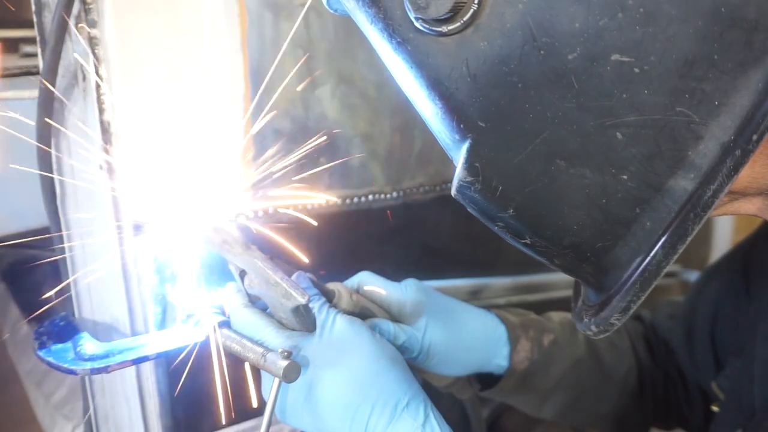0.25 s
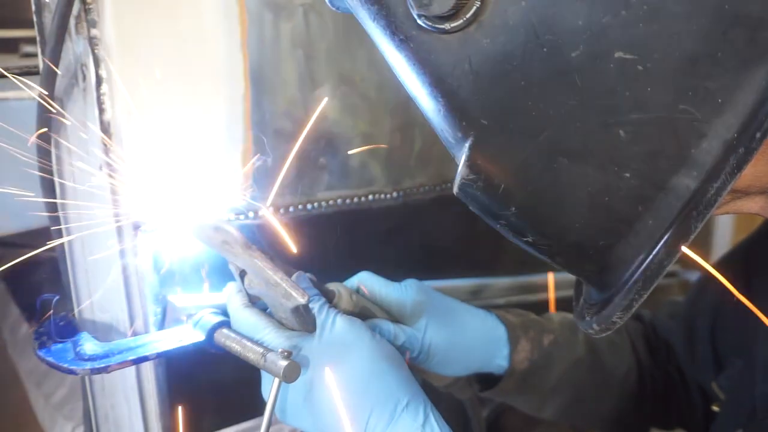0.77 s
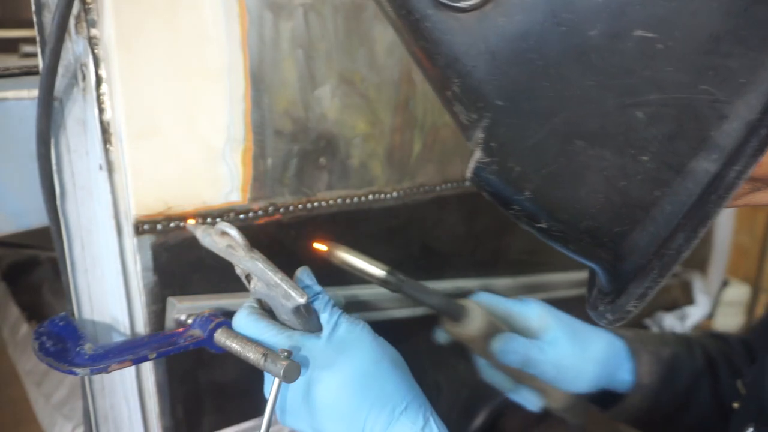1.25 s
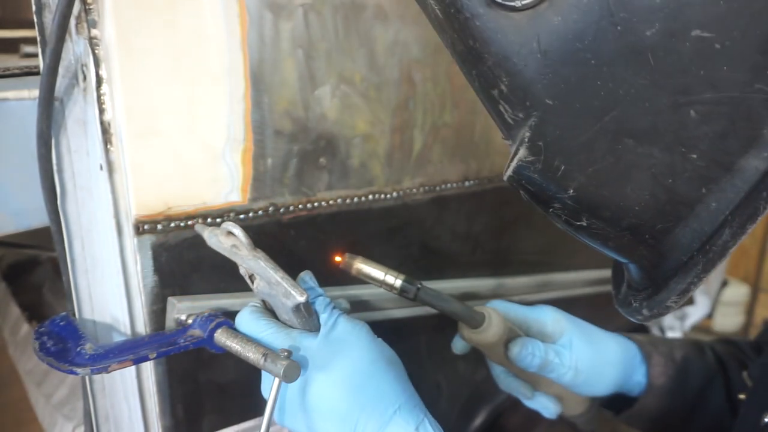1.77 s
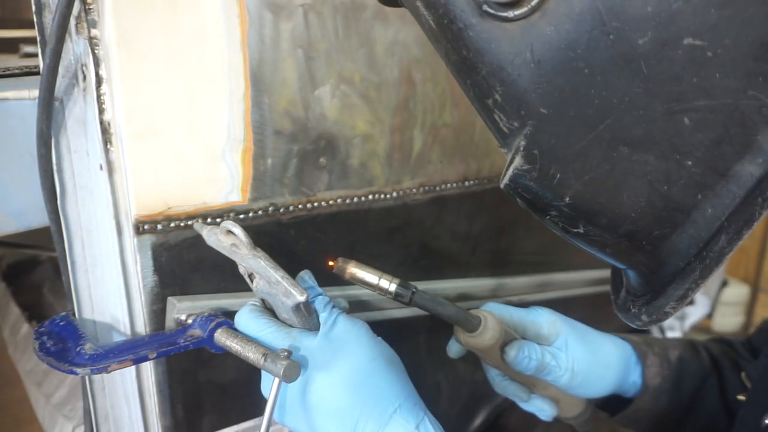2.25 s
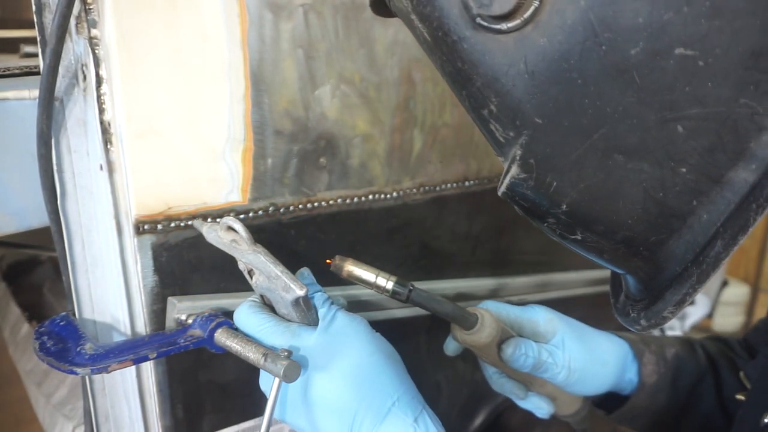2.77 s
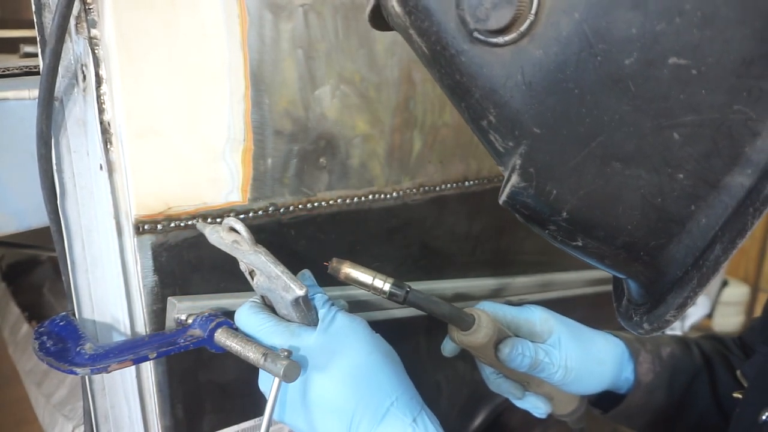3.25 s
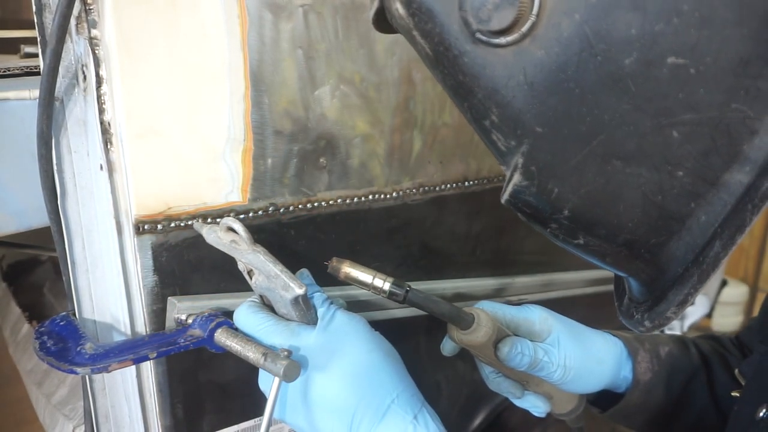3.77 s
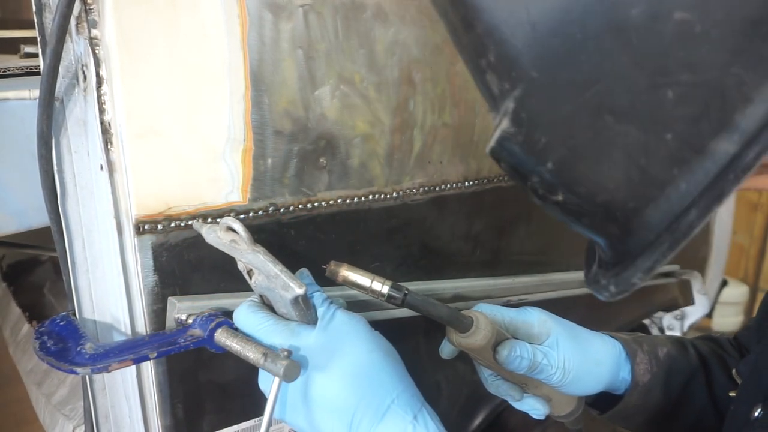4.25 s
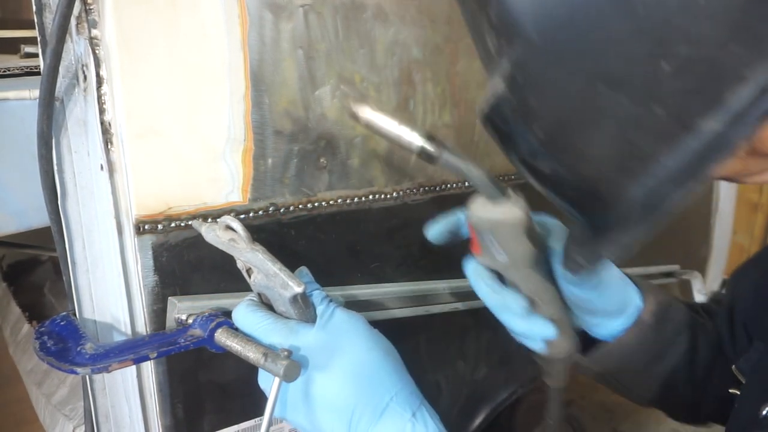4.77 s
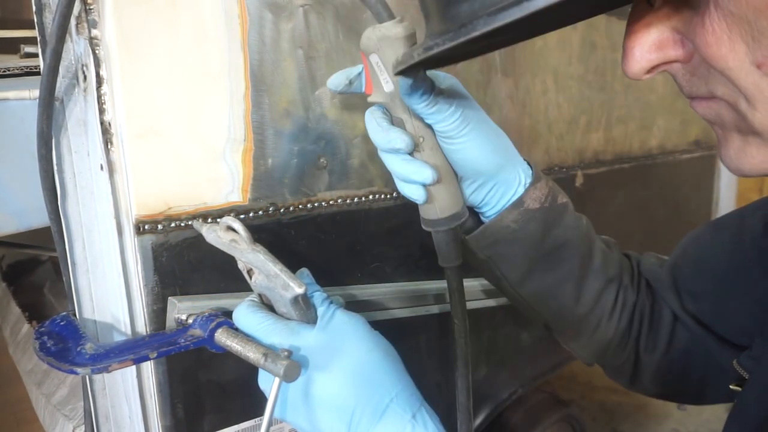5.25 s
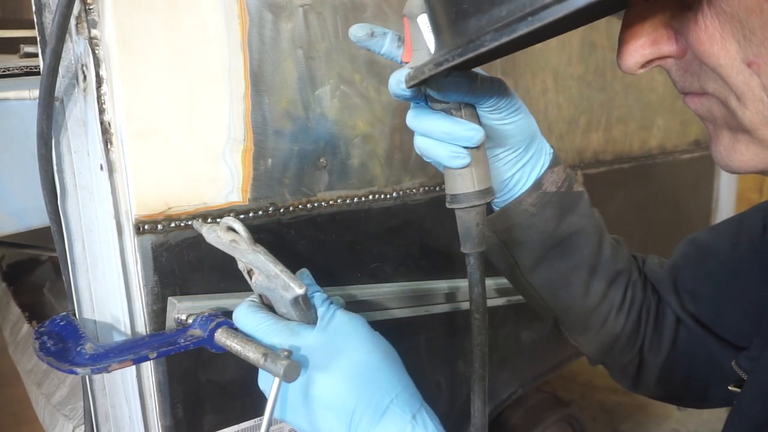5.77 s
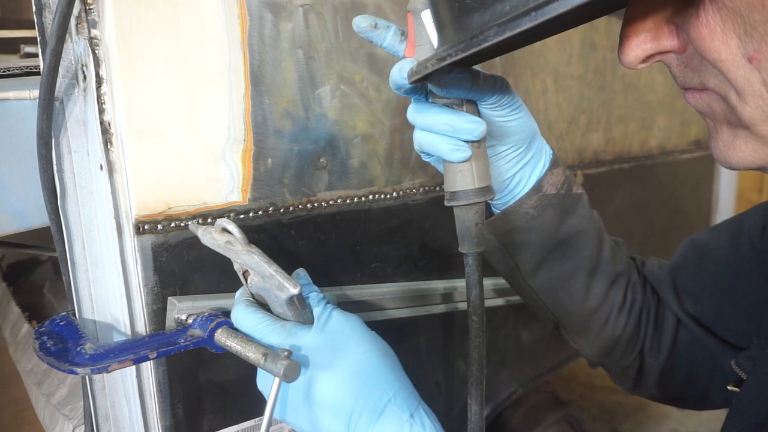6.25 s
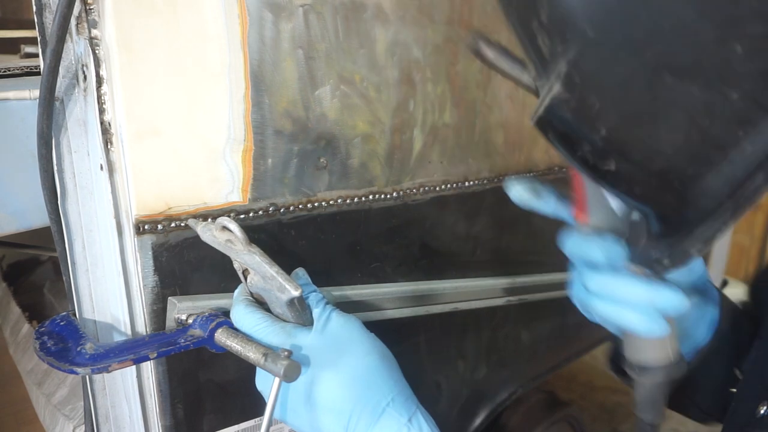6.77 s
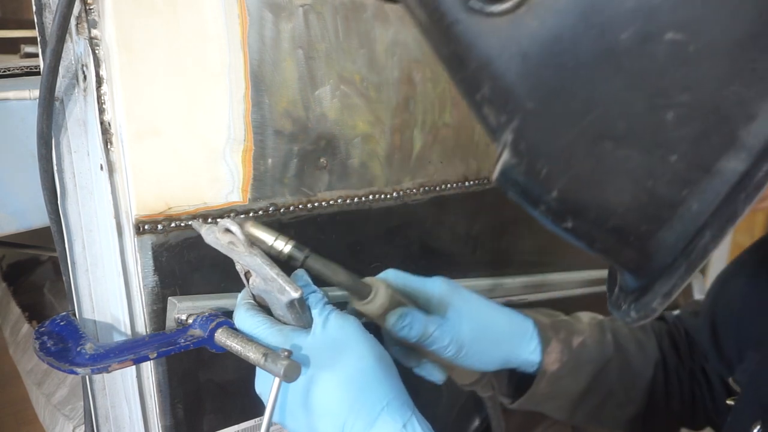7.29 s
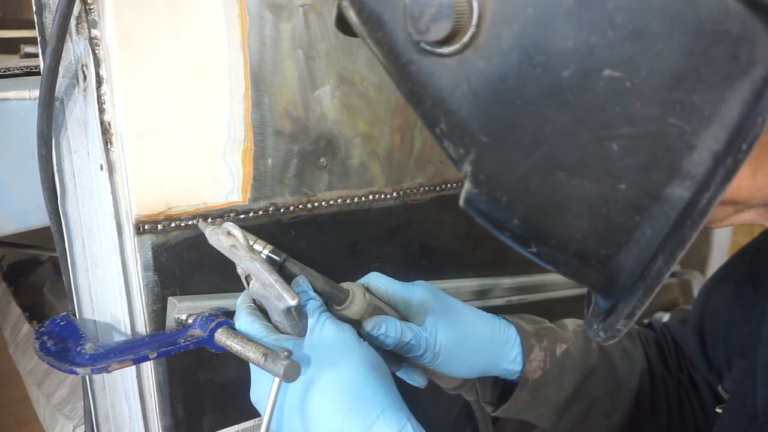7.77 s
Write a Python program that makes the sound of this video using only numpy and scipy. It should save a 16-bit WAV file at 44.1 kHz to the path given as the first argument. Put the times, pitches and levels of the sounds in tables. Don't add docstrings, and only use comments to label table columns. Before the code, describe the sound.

Harsh, dry welding crackle opens the scene, heard very near in stereo with a short workshop reverberation. After a small gap, a sharp high-pitched air hiss starts and holds, fluttering slightly, faintly singing at moments. It ends abruptly around six seconds. The automatic level slowly lifts the quiet fan tone and rushing air, while soft thumps, a light click on metal and a small wiry squeal are heard.

```python
import sys
import numpy as np
from scipy import signal
from scipy.fft import rfft, irfft, next_fast_len
from scipy.io import wavfile

SR = 44100
rng = np.random.default_rng(int(sys.argv[2]) if len(sys.argv) > 2 else 0)


def to_wav(sig):
    pcm = np.clip(np.atleast_2d(sig), -1, 1) * 32767
    pcm = np.round(pcm).astype(np.int16)
    wavfile.write(sys.argv[1], SR, pcm.T)


def field_ratio(decibels):
    return 10 ** (np.asarray(decibels, dtype=float) / 20)


N = 353682
TIME = np.arange(N) / SR
SIZE = next_fast_len(N + SR)
HZ = np.maximum(np.arange(SIZE // 2 + 1) * SR / SIZE, 1)

# start_s, crack_peak_db, pop_above_crack_db (bigger drop, louder pop)
SPUTTER = [(.03415, -9, -8), (.04565, -14, -31), (.06317, -11, -37), (.07059, -13, -38), (.07531, -14, -39),
           (.08567, -13, -50), (.09594, -14, -46), (.10392, -12, -39), (.11687, -12, -31),
           (.12556, -12, -43), (.15789, -11, -37), (.17519, -14, -29), (.18907, -14, -45),
           (.20515, -12, -27), (.20973, -12, -43), (.22739, -12, -20), (.24005, -12, -42),
           (.24515, -9, -13), (.24998, -16, -32), (.26837, -13, -38), (.28626, -11, -45),
           (.30447, -12, -39), (.31002, -15, -22), (.33032, -11, -33), (.33617, -12, -35),
           (.34653, -13, -37), (.37283, -14, -33), (.3893, -12, -42), (.39435, -12, -39), (.4007, -14, -42)]
# start_s, crack_peak_db, pop_above_crack_db
STEADY = [(.45447, -8, -26), (.46007, -13, -36), (.48914, -12, -28), (.50127, -11, -25), (.52288, -11, -23),
          (.53535, -13, -32), (.54825, -12, -31), (.55444, -13, -33), (.56102, -12, -35),
          (.58363, -11, -41), (.59757, -11, -39), (.62068, -12, -38), (.63463, -9, -35), (.64812, -13, -30),
          (.661, -12, -30), (.67517, -12, -28), (.69095, -12, -36), (.70526, -10, -35), (.71714, -12, -30),
          (.72454, -13, -43), (.73184, -12, -37), (.74757, -11, -34), (.75481, -15, -31),
          (.76281, -10, -30), (.77984, -12, -24), (.78717, -11, -33), (.79941, -14, -32), (.81426, -9, -35),
          (.8273, -9, -28), (.87122, -13, -36)]
# time_s, level_db
SIZZLE = [(0, -40), (.05, -38.5), (.14, -51), (.25, -47), (.41, -46), (.435, -33.5), (.47, -41), (.6, -47),
          (.82, -49)]
# pitch_hz, width_hz, left_gain, right_gain
CRACK_RESONANCES = [(1250, 900, -.3, -.45), (1850, 600, -1.1, -.5), (2700, 1900, -.85, -.8),
                    (4100, 1100, -.9, -.6), (6240, 600, 1.9, .3), (7900, 1650, 5.6, -.25),
                    (9600, 2100, -2.5, 2.5)]
# delay_ms, left_gain, right_gain
CRACK_ECHOES = [(.5, -.35, -.35), (.75, -.05, -.26), (1.13, 0, -.3), (1.51, -.04, .17), (1.84, .22, .16),
                (2.28, -.1, .05), (6.9, .1, .06)]

# pitch_hz, level_db, settling_change_db
WHINE = [(220, -92, -4), (405, -79, -7), (586.6, -48, 0.0), (673, -69, 0.0), (764, -83.5, -4),
         (1002, -83, 0), (1166, -89, 13), (1216, -90.5, 6)]
# pitch_hz, density_db
FAN_AIR = [(24, -81), (40, -54), (112, -67.5), (212, -40), (309, -46), (391, -34), (450, -42.5), (518, -25),
           (583, -14.5), (737, -32.5), (890, -32.5), (1460, -27), (3090, -34.5), (5560, -34.5),
           (11000, -48.5), (14300, -93), (22000, -120)]
# pitch_hz, left_minus_right_db
FAN_BALANCE = [(60, 5.5), (110, -7.5), (190, 3), (350, -2.5), (630, -4.5), (1130, -11.5), (2020, -5),
               (3640, -5.5), (6540, -2), (11800, -3)]
# time_s, level_db
AIR_SWELL = [(0, 6), (6.3, 2.5), (6.65, -3), (6.75, 0), (8.02, 3)]
# middle_s, length_s, lift_db
TONE_SWELL = (3.42, .35, 4.5)

# start_s, peak_db, pitch_hz, width_hz
BUMPS = [(.83, -48, 300, 110), (.88, -56, 300, 110), (6.1, -69, 300, 350), (6.72, -62, 1230, 1200),
         (6.724, -58, 303, 486), (6.755, -72, 140, 201), (6.781, -67, 200, 270), (6.775, -49, 490, 200),
         (6.83, -63, 330, 300), (7.52, -75, 250, 300), (7.69, -69, 220, 300)]
# start_s, peak_db, pitch_hz, width_hz, t60_s
LEAKS = [
    (1.06, -42, 9400, 2160, .81),
    (7.52, -57, 9700, 2520, 0.34),
    (7.83, -43.5, 10880, 350, 0.34),
]
# start_s, peak_db, pitch_hz, width_hz, t60_s
TICKS = [
    (6.84, -62, 1980, 400, 0.27),
    (6.845, -67, 2680, 900, .25),
    (6.85, -72, 6800, 5000, .21),
    (7.696, -52.5, 5500, 9050, .053),
    (7.699, -60, 6481, 6480, .42),
]

# time_s, level_db, turned_away (0-1)
JET = [(1.257, -31.5, 0.01), (1.272, -36.5, 0), (1.33, -33, 0), (1.42, -32, 0.2), (1.7, -33, 0.2),
       (2.2, -32.5, .4), (2.6, -32.5, 0.6), (3, -32, .6), (3.6, -32, 0.5), (4.2, -33, 0.5),
       (4.7, -31.5, 0.8), (5.04, -31, .7), (5.2, -32, 0.6), (5.8, -32, .7), (6.08, -32, .7)]
# pitch_hz, level_db
JET_COLOUR = [(30, -72), (80, -56), (300, -40), (700, -22.5), (1200, -18.5), (2000, -17), (2900, -14),
              (5000, -8.5), (7000, -5), (8500, -2.5), (9500, -1), (10300, 3), (10900, 4), (13000, 2)]
# pitch_hz, left_minus_right_db
JET_BALANCE = [(100, -9), (350, 4), (1100, 4), (2000, 1), (3600, 6), (6500, 6), (9000, 6), (10200, 2.5),
               (10900, 7.5)]
# pitch_hz, left_lead_rad
JET_LEAD = [(100, -.5), (1200, 0.0), (2200, .4), (3200, 1.7), (6500, 2.0), (9400, 2.0), (10700, 2.6),
            (12000, 2.8)]
# middle_s, length_s, pitch_hz, width_hz, level_db
EDGE_TONES = [(1.42, .06, 4000, 300, -46), (1.57, .04, 4400, 300, -48), (2.45, .08, 4100, 250, -55),
              (5.02, .04, 10300, 900, -38), (4.55, .3, 2800, 160, -55), (5.15, .35, 2950, 260, -53),
              (5.85, .3, 2950, 260, -51)]

# pitch_hz, send_db
ROOM_SEND = [(200, -10), (600, 1), (3000, 2.5), (8000, -2.5), (11000, 0)]
# pitch_hz, t60_s
ROOM_T60 = [(200, 0.34), (450, 0.43), (1000, 0.52), (3000, 0.48), (6000, 0.5), (11000, 0.37)]
# start_s, end_s, depth_db, creep_db_per_s, release_s
DUCKS = [
    (-.1, 0, 22, 0, .018),
    (.034, .87, 28, 8, .055),
    (1.245, 6, 24.5, 1.5, 0.25),
]


def rms_one(x):
    return x / np.sqrt(np.mean(x ** 2) + 1e-20)


def in_time(rows):
    s, *columns = np.transpose(rows)
    return [np.interp(TIME, s, column) for column in columns]


def at_hz(points, hz):
    point_hz, value = np.array(points).T
    return np.interp(np.log(hz), np.log(point_hz), value)


def shaped(x, response):
    return irfft(rfft(x, SIZE) * response, SIZE)[..., :N]


def late(ms):
    return np.exp(-2j * np.pi * HZ * ms / 1000)


def resonate(x, hz, width_hz):
    r = np.exp(-np.pi * width_hz / SR)
    poles = [1, -2 * r * np.cos(2 * np.pi * hz / SR), r * r]
    return signal.lfilter([(1 - r * r) / 2, 0, (r * r - 1) / 2], poles, x)


def band_pass(x, low, high):
    return signal.sosfilt(signal.butter(2, [low, high], "band", fs=SR, output="sos"), x)


def drift(rate):
    r = np.exp(-80 * np.pi * rate / SR)
    slow = signal.lfilter([1], [1, -2 * r, r * r], rng.standard_normal(N // 40 + 2002))[2000:]
    return np.interp(np.arange(N) / 40, np.arange(len(slow)), rms_one(slow))


def ports(x, balance, lead):
    half = field_ratio(at_hz(balance, HZ) / 2) * np.exp(.5j * lead)
    return shaped(x, np.array([half, 1 / half]))


def burst(start, rise, t60, hz, width_hz):
    t = np.arange(SR // 2) / SR
    noise = resonate(resonate(rng.standard_normal(len(t)), hz, width_hz), hz, width_hz)
    swell = 1 - np.exp(-(t / rise) ** 2)
    fade_out = np.minimum((.5 - t) / .1, 1)
    out, at = np.zeros(N + len(t)), round(start * SR)
    out[at:at + len(t)] = rms_one(noise) * swell * field_ratio(-60 * t / t60) * fade_out
    return out[:N]


def gain_ride():
    rest_db, duck_s, slow_release_s = 4, .03, 1.4
    gain_db = rest_db
    for start, end, depth_db, creep, release in DUCKS:
        held_db = depth_db - creep * (np.clip(TIME, start, end) - start)
        since = np.maximum(TIME - end, 0)
        slow = np.clip(0.57 * (1 - np.exp(-(end - start) / 0.99)), 0, 1)
        left = (1 - slow) * np.exp(-since / release) + slow * np.exp(-since / slow_release_s)
        gain_db = gain_db - held_db * np.clip((TIME - start) / duck_s, 0, 1) * left
    return gain_db


def shorts():
    touch_share, touch_db, touch_pop_db = .75, -24, -32
    touch_lead_s = (.003, .009)
    restrike_s, stub_step_s, stub_db, stub_pop_db = .4545, .004, -23.5, -36
    s, crack_db, pop_db = np.transpose(SPUTTER + STEADY)
    luck = rng.random((len(s), 3))
    grazed = luck[:, 0] < touch_share
    touches = (s - np.interp(luck[:, 1], [0, 1], touch_lead_s))[grazed]
    touch_crack_db = touch_db + 6 * (luck[grazed, 0] - .4)
    touch_pops_db = touch_pop_db + 10 * (luck[grazed, 2] - .5)
    stubs = restrike_s - stub_step_s * np.arange(1, 7)
    crack_db = np.r_[crack_db, touch_crack_db, np.full(len(stubs), stub_db)]
    pop_db = np.r_[pop_db, touch_pops_db, np.full(len(stubs), stub_pop_db)]
    body_db = -16.5 + 0.41 * (pop_db + 33)
    return np.r_[s, touches, stubs], crack_db, body_db, pop_db


def arc(gain_db):
    s, crack_db, body_db, pop_db = shorts()
    at = np.round(s * SR).astype(int)
    crack_db = crack_db - gain_db[at]
    pops = np.zeros(N)
    pops[at] = field_ratio(crack_db + 1.06 * pop_db + 27.5)

    spit_size = field_ratio(4.0 * np.minimum(rng.exponential(1, N), 5))
    spits = (rng.random(N) < 9000 / SR) * spit_size * rng.choice([-1, 1], N)
    sizzle = rms_one(spits) * field_ratio(in_time(SIZZLE)[0] - gain_db - 5) * (TIME < .88)

    shades_db = 1.2 * rng.normal(0, 1, (len(at), len(CRACK_RESONANCES)))
    crack = 0
    for k, (hz, width_hz, left, right) in enumerate(CRACK_RESONANCES):
        clicks = sizzle.copy()
        big_db = (np.minimum(body_db, -13.5) + 17.5) * np.clip((3800 - hz) / 2600, 0, 1)
        clicks[at] += field_ratio(crack_db + big_db + 1.3 + shades_db[:, k])
        crack = crack + resonate(clicks, hz, width_hz) * [[left], [right]]
    bounce = 1 + sum(np.array([[left], [right]]) * late(ms) for ms, left, right in CRACK_ECHOES)
    crack = shaped(crack, bounce * np.array([late(-.072), late(-.01)]))

    pop = shaped(resonate(pops, 515, 320), late(.2))
    thud = field_ratio(-6) * resonate(pops, 200, 330)
    return crack + thud + ports(pop, [(100, -6.0), (1000, -9.0)], -2.37)


def fan():
    waver = np.cumsum(1 + 0.000652 * drift(0.46) + .0012 * drift(14.5)) / SR
    settled = np.clip((TIME - 6.5) / 1.07, 0, 1)
    tones = 0
    for hz, level_db, change_db in WHINE:
        tone_db = level_db + change_db * settled + 3 + 0.59 * drift(5.9)
        tones = tones + field_ratio(tone_db) * np.sin(2 * np.pi * hz * waver)
    s, length, swell_db = TONE_SWELL
    tones = tones * field_ratio(swell_db * np.exp(-((TIME - s) / length) ** 2))
    skirt = field_ratio(-70) * rms_one(resonate(resonate(rng.standard_normal(N), 592, 120), 592, 120))

    shared, left, right = shaped(rng.standard_normal((3, N)), field_ratio(at_hz(FAN_AIR, HZ)))
    apart = 1 / (1 + (1400 / HZ) ** 2)
    air = shaped(shared, np.sqrt(1 - apart)) + shaped(np.array([left, right]), np.sqrt(apart))
    air = shaped(air, field_ratio(at_hz(FAN_BALANCE, HZ) * [[.5], [-.5]]))
    air = field_ratio(-64.5) * rms_one(air) * field_ratio(in_time(AIR_SWELL)[0] + .8 * drift(2.7))
    return ports(tones + skirt, FAN_BALANCE, -0.25) + air


def body_bumps():
    return sum(field_ratio(peak_db) * burst(s, 0.011, 0.18, hz, width_hz) for s, peak_db, hz, width_hz in BUMPS)


def trigger_leaks():
    return sum(field_ratio(peak_db) * burst(s, .11 * t60, t60, hz, width_hz)
               for s, peak_db, hz, width_hz, t60 in LEAKS)


def air_gun(gain_db):
    on_s, open_s, off_s, shut_s = 1.243, 0.016, 6.104, 0.023
    treble_db, away = in_time(JET)
    wobble_db = .6 * drift(7.1)
    middle_db = 0.5 * away + wobble_db
    bass_db = -14 * away + 2.25 * wobble_db
    white, together, bands = rng.standard_normal((2, N)), drift(22), 0
    edges = 35 * 2 ** np.arange(0, 9.1, .5)
    for k, (low, high) in enumerate(zip(edges, edges[1:])):
        band = band_pass(white[k % 2], low, high)
        middle = np.interp(np.log2(low), np.log2([400, 1200, 4000, 7000]), [0, 1, 1, 0])
        bass = np.interp(np.log2(low), np.log2([400, 1200]), [1, 0])
        aim_db = middle * (middle_db - middle_db.mean()) + bass * (bass_db - bass_db.mean())
        flutter_db = .5 * together + 0.56 * drift(2.4) + 1.13 * drift(58)
        bands = bands + band * field_ratio(flutter_db + aim_db)
    jet = rms_one(shaped(bands, field_ratio(at_hz(JET_COLOUR, HZ)))) * field_ratio(treble_db + 5.0)
    for s, length, hz, width_hz, level_db in EDGE_TONES:
        tone = rms_one(resonate(resonate(white[0], hz, width_hz), hz, width_hz))
        jet = jet + field_ratio(level_db) * tone * np.exp(-((TIME - s) / length) ** 2)
    trigger = np.clip((TIME - on_s) / open_s, 0, 1) * np.clip((off_s - TIME) / shut_s, 0, 1)
    return jet * trigger * field_ratio(-gain_db)


def torch_ticks():
    return sum(field_ratio(peak_db) * burst(s, 0.0032, t60, hz, width_hz)
               for s, peak_db, hz, width_hz, t60 in TICKS)


def workshop(x):
    white, tail = rng.standard_normal((2, 3, N)), 0
    edges = 177 * 2 ** (np.arange(20) / 3)
    build = np.exp(-1 / (0.0046 * SR))
    for k, (low, high) in enumerate(zip(edges, edges[1:])):
        keep = field_ratio(-120 / (at_hz(ROOM_T60, np.sqrt(low * high)) * SR))
        energy = signal.lfilter([1 - keep], [1, -keep], band_pass(x, low, high) ** 2)
        energy = signal.lfilter([1 - build], [1, -build], energy)
        shared, *own = rms_one(band_pass(white[k % 2], low, high))
        apart = 1 / (1 + (700 / low) ** 2)
        noise = np.sqrt(1 - apart) * shared + np.sqrt(apart) * np.array(own)
        tail = tail + np.sqrt(energy) * noise
    return tail


def scene():
    gain_db = gain_ride()
    welding, jet = arc(gain_db), air_gun(gain_db)
    handling = body_bumps() + trigger_leaks() + torch_ticks()
    pan_db = -4 * in_time(JET)[-1]
    swing = field_ratio((pan_db - pan_db.mean()) * [[.5], [-.5]])
    jet_ports = swing * ports(jet, JET_BALANCE, at_hz(JET_LEAD, HZ))
    direct = welding + jet_ports + handling * field_ratio([[-1.5], [1.5]])
    sent = field_ratio(-6.5) * welding[0] + jet
    room = workshop(shaped(sent, field_ratio(at_hz(ROOM_SEND, HZ)))) * field_ratio([[1.5], [-1.5]])
    return direct + room + fan()


def roll_off(x):
    return signal.sosfilt(signal.butter(12, 12360, fs=SR, output="sos"), x)


def record(dry):
    cutoff_hz = 11040
    cut = 1 / (1 + np.minimum(HZ / cutoff_hz, 1.2) ** 900)
    ridden = shaped(dry * field_ratio(gain_ride()), cut)
    bent = ridden - 4 * ridden ** 5
    return roll_off(bent)


dry = scene()
out = record(dry)
to_wav(out)
```